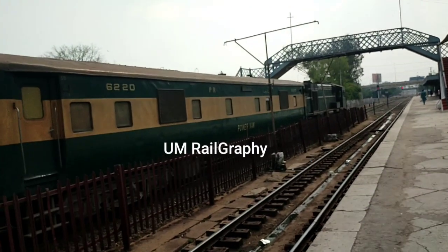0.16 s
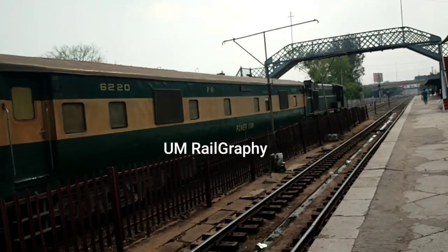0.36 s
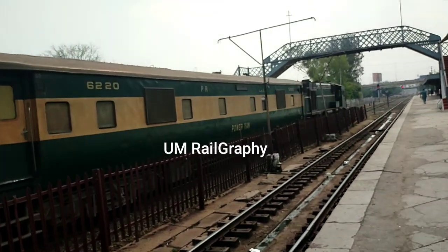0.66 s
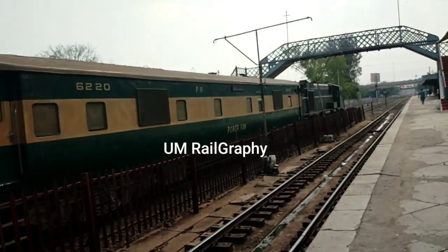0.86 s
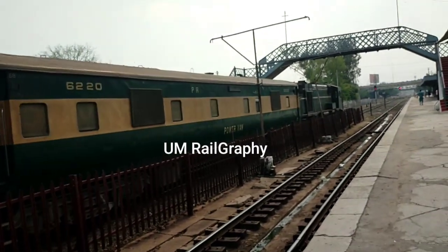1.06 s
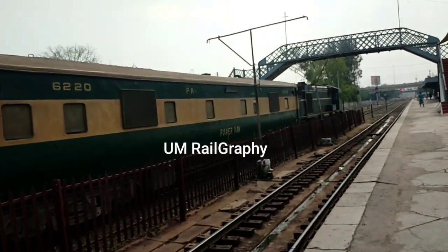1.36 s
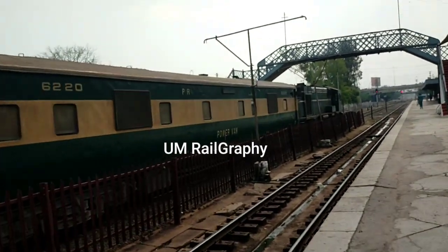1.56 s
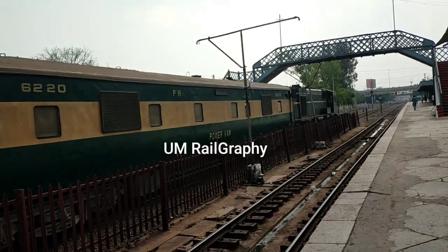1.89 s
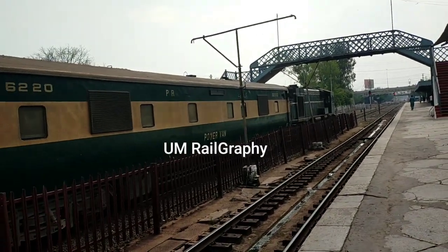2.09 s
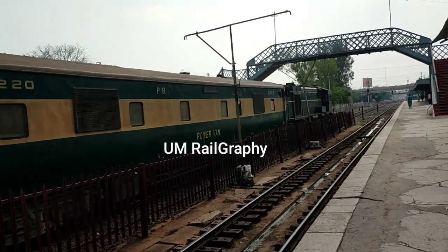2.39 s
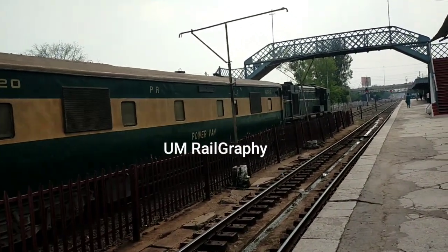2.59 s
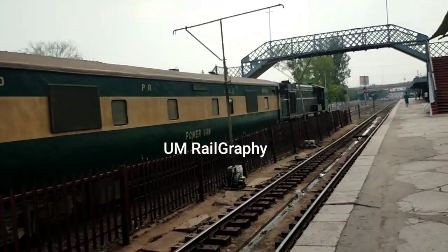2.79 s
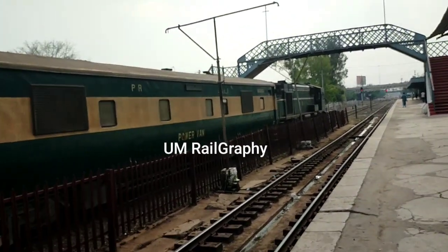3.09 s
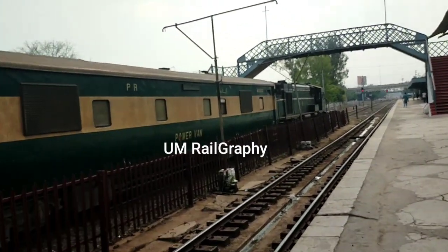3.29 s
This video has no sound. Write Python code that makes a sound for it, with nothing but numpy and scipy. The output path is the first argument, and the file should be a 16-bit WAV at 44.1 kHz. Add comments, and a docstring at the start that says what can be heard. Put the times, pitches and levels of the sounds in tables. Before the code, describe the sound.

Constant-speed diesel generator heard from an outdoor platform: deep throbbing hum and exhaust rumble, quick mechanical rattle, broad airy rush and faint hiss, slightly louder later as the walking listener's microphone nears the vents.

```python
"""On a station platform beside a standing train, a six-cylinder diesel generator runs in the power van.
Periodic firing gives the exhaust a harmonic series of engine orders above a turbulent rumble; two close tones
beat in a low drone. The block clatters in a pattern repeated every engine cycle, and cooling air rushes out
as shaped noise; both grow, on the whole, as the louvres come nearer. A faint hiss lies on top."""
import sys
import numpy as np
from scipy import signal
from scipy.fft import rfft, irfft
from scipy.io import wavfile
from scipy.ndimage import map_coordinates

SR = 44100
rng = np.random.default_rng(int(sys.argv[2]) if len(sys.argv) > 2 else 0)


def output_pcm(signal):
    """Save a mono or channel-first signal as 16-bit PCM at the path in sys.argv[1].

    Samples are clipped to [-1, 1] before scaling.
    """
    pcm = np.clip(np.atleast_2d(signal).T, -1, 1) * 32767
    wavfile.write(sys.argv[1], SR, np.round(pcm).astype(np.int16))


N = 152145
T = np.arange(N) / SR   # time [s]

CYCLE_HZ, CYLINDERS = 12.522, 6   # one cycle fires every cylinder once
SPEED_WANDER, WANDER_HZ = 0.00061, 1.4   # spread as a share of the speed; rate of drift
FLUTTER_HZ = 18   # rate of the level flutter in the air and the hiss


def from_db(db):
    """Logarithmic level: 20 dB is a tenfold amplitude."""
    return 10 ** (np.asarray(db) / 20)


def rms_one(x):
    """Power normalisation: scale to a mean square of one."""
    return x / np.sqrt(np.mean(x ** 2) + 1e-20)


def in_time(curve):
    """Linear interpolation: the level in dB at every sample of a (time, level) curve."""
    time_s, level_db = np.transpose(curve)
    return np.interp(T, time_s, level_db)


def drift(rate_hz):
    """Low-pass filtered noise: a smooth random wander of unit spread."""
    step = 100   # samples between the slow values
    pole = np.exp(-2 * np.pi * rate_hz * step / SR)
    white = rng.standard_normal(N // step + 2002)
    slow = signal.lfilter([1], [1, -2 * pole, pole * pole], white)[2000:]   # drop the filter's start
    slow = rms_one(slow - slow.mean())
    return np.interp(np.arange(N) / step, np.arange(len(slow)), slow)


def sine(turns):
    """Simple harmonic motion: a tone of unit power from a random starting phase."""
    return np.sqrt(2) * np.sin(2 * np.pi * (turns + rng.random()))


def coloured(white, spectrum):
    """Spectral shaping: weight unit white noise to a density in dB per Hz."""
    hz = np.maximum(np.arange(N // 2 + 1) * SR / N, 1)
    points_hz, db = np.transpose(spectrum)
    octaves_outside = np.abs(np.log2(hz / np.clip(hz, points_hz[0], points_hz[-1])))
    level_db = np.interp(np.log(hz), np.log(points_hz), db)
    level_db = level_db - 24 * octaves_outside   # falls away beyond the table's ends
    return irfft(rfft(white) * from_db(level_db), N) * np.sqrt(SR / 2)


def along_the_walk(white, table):
    """Cross-fading: the noise spectrum glides from column to column as the listener walks."""
    table = np.array(table)
    stops_s = np.linspace(0, T[-1], table.shape[1] - 1)
    out = 0
    for k, share in enumerate(np.eye(len(stops_s))):
        weight = np.interp(T, stops_s, share)
        out = out + weight * coloured(white, table[:, [0, k + 1]])
    return out


# Hum at twice the firing rate: (time [s], level [dB])
HUM_LEVEL = [(0.03, -23), (0.71, -22.5), (0.77, -25.5), (1.62, -24), (1.67, -20), (2.29, -25.5),
             (2.41, -33.5), (2.47, -27), (2.63, -39), (2.77, -26), (3.42, -27)]
# Exhaust orders: (multiple of the cycle rate [rounded to a whole order when played],
# level [dB] at four evenly spaced moments)
EXHAUST_ORDERS = [(6, -51, -46.5, -39, -38), (7, -49.5, -47.5, -47.5, -46), (9, -42, -42, -43.5, -43),
                  (10, -49, -46.5, -40.5, -49), (14, -39.5, -35, -37, -38.5), (15, -39, -37.5, -34, -41),
                  (26, -30, -33.5, -35.5, -47), (33, -57, -46, -49.5, -44), (34, -50, -48.5, -40, -38),
                  (36, -44, -41, -41, -42.5), (39, -46.5, -40.5, -37, -37.5),
                  (67.5, -44.5, -48.5, -52.5, -53), (82.13, -45.5, -48, -44.5, -50),
                  (111.15, -58.5, -51.5, -49, -50)]
# Swell of the rumble: (time [s], level [dB])
RUMBLE_LEVEL = [(0, 0), (.4, -2), (1.0, -0.5), (1.5, -1), (1.68, 2), (1.95, 1.5), (2.3, -0.5), (2.65, -2.5),
                (3.1, 1), (3.45, -3)]
# Rumble spectrum before the swell: (frequency [Hz], density [dB per Hz] at the start, midway, at the end)
RUMBLE_SPECTRUM = [(25, -97, -90, -88), (42, -90.5, -82.5, -82), (56.3, -77.5, -71, -74),
                   (71, -67.5, -65, -66), (100, -53, -52, -53), (141, -55, -53.5, -47.5),
                   (184, -46, -45, -48), (225, -58, -52.5, -55.5), (267, -47.5, -50.5, -50.5),
                   (332, -50.5, -57, -55.5), (392, -60.5, -58.5, -53.5), (495, -67.5, -57.5, -58),
                   (588, -70.5, -67.5, -70.5), (1000, -85, -88, -83)]
ORDER_WAVER_DB, WAVER_HZ = 1.5, 0.96


def exhaust(cycles):
    """Order analysis: tones at whole multiples of the cycle rate, with broadband turbulence."""
    out = from_db(in_time(HUM_LEVEL)) * sine(2 * CYLINDERS * cycles)
    for multiple, *levels_db in EXHAUST_ORDERS:
        level_db = np.interp(T, np.linspace(0, T[-1], len(levels_db)), levels_db)
        level_db = level_db + ORDER_WAVER_DB * drift(WAVER_HZ)
        out = out + from_db(level_db) * sine(round(multiple) * cycles)
    rumble = along_the_walk(rng.standard_normal(N), RUMBLE_SPECTRUM)
    return out + from_db(in_time(RUMBLE_LEVEL)) * rumble


# Gusty part, tone and noise together, before their own shares: (time [s], level [dB])
GUSTY_LEVEL = [(0.03, -34), (0.1, -36), (0.12, -28), (0.72, -30), (1.63, -24.5), (1.71, -17), (1.79, -30),
               (1.9, -14), (2.07, -34), (2.13, -15), (2.35, -33.5), (2.38, -24), (2.66, -29), (2.69, -45),
               (2.8, -16.5), (2.84, -40.5), (2.87, -34), (3.42, -30.5)]
# Steadier tone, probably fan blades: (time [s], level [dB])
FAN_LEVEL = [(0, -39), (.75, -36.5), (1.1, -29.5), (1.5, -29), (2.4, -31), (3.45, -30.5)]
GUSTY_TONE_HZ, GUSTY_TONE_DB, FAN_HZ = 203.2, -3.5, 207.6
BAND_HZ, BAND_WIDTH_HZ, BAND_NOISE_DB = 194, 36.4, -7.5   # narrow band of turbulence


def drone():
    """Beating: a swelling tone in narrow-band noise interferes with a steadier tone just above it."""
    edges_hz = [BAND_HZ - BAND_WIDTH_HZ / 2, BAND_HZ + BAND_WIDTH_HZ / 2]
    band = signal.butter(2, edges_hz, "band", fs=SR, output="sos")
    turbulence = rms_one(signal.sosfilt(band, rng.standard_normal(N + SR))[SR:])   # drop the filter's start
    tone = from_db(GUSTY_TONE_DB) * sine(GUSTY_TONE_HZ * T)
    gusty = tone + from_db(BAND_NOISE_DB) * turbulence
    fan = from_db(in_time(FAN_LEVEL)) * sine(FAN_HZ * T)
    return from_db(in_time(GUSTY_LEVEL)) * gusty + fan


# Nearness of the louvres, before the reference is subtracted: (time [s], level [dB])
NEARNESS = [(0.03, -32), (1.58, -32), (1.6, -30), (2.79, -30), (2.81, -27.5), (3.4, -28), (3.42, -29.5)]
NEARNESS_REF_DB = -29.5


def nearness_db():
    """Distance law in outline: the level follows the nearness of the louvres, relative to a reference."""
    return in_time(NEARNESS) - NEARNESS_REF_DB


KNOCK_DEPTH, KNOCK_DECAY_S = 0.19, 0.0023   # height as a share of the steady part


def firing_surge(cycles):
    """Amplitude modulation: every firing gives an equal surge that decays exponentially."""
    age_s = cycles * CYLINDERS % 1 / (CYCLE_HZ * CYLINDERS)
    return rms_one(1 + KNOCK_DEPTH * np.exp(-age_s / KNOCK_DECAY_S))


def every_cycle(cycles):
    """Periodicity: one cycle of random rattle, played again on every engine cycle."""
    size = int(SR / CYCLE_HZ)
    pattern = rng.standard_normal(size)
    return rms_one(map_coordinates(pattern, [cycles % 1 * size], order=3, mode="grid-wrap"))


# Clatter spectrum before nearness: (frequency [Hz], density [dB per Hz] at the start, midway, at the end)
CLATTER_SPECTRUM = [(71.6, -73, -76, -74), (111, -62.5, -61.5, -60.5), (280, -58, -59, -56),
                    (470, -67.5, -63, -61), (660, -70, -70.5, -70.5), (770, -62.5, -64, -67.5),
                    (1050, -65, -61.5, -66.5), (1300, -65, -68, -61.5), (1990, -72.5, -72, -68.5),
                    (3170, -84.5, -83.5, -84), (4240, -110, -110, -110)]
PATTERN_CHANGE, PATTERN_HZ = .6, .8   # changing part against the fixed part; its rate of drift
CLATTER_FOLLOWS = 0.68   # dB of clatter per dB of nearness


def block_clatter(cycles):
    """Cyclostationary noise: a repeating rattle, slowly changing, throbs with the firings."""
    changing = rms_one(sum(drift(PATTERN_HZ) * every_cycle(cycles) for _ in range(3)))
    pattern = rms_one(every_cycle(cycles) + PATTERN_CHANGE * changing)
    clatter = along_the_walk(firing_surge(cycles) * pattern, CLATTER_SPECTRUM)
    return from_db(CLATTER_FOLLOWS * nearness_db()) * clatter


# Air spectrum before nearness: (frequency [Hz], density [dB per Hz] at the start, midway, at the end)
AIR_SPECTRUM = [(300, -76.5, -77, -74), (540, -61.5, -64.5, -71.5), (690, -67, -66, -67),
                (960, -61.5, -62, -60.5), (1300, -63.5, -62.5, -62), (1650, -65.5, -61.5, -61.5),
                (1780, -64, -65.5, -72), (1970, -66.5, -65.5, -63), (2670, -71.5, -71, -71.5),
                (3440, -76, -76.5, -78.5), (4020, -90.5, -92, -91.5), (5000, -105, -105, -105)]
AIR_FOLLOWS, AIR_FLUTTER_DB = 1.08, .5   # dB of air per dB of nearness; flutter spread


def cooling_air(cycles):
    """Flow noise: broadband turbulence throbs with the firings and flutters in level."""
    air = along_the_walk(firing_surge(cycles) * rng.standard_normal(N), AIR_SPECTRUM)
    level_db = AIR_FOLLOWS * nearness_db() + AIR_FLUTTER_DB * drift(FLUTTER_HZ)
    return from_db(level_db) * air


# Levels of the hiss and of the top treble, before trim and flutter: (time [s], level [dB])
HISS_LEVEL = [(0.03, -55), (0.07, -55), (0.44, -60), (0.49, -56.5), (1.35, -58.5), (1.73, -56),
              (1.75, -51.5), (1.79, -55.5), (1.96, -52.5), (2.03, -54.5), (2.3, -54.5), (2.37, -56),
              (2.38, -55), (2.95, -52), (2.99, -54.5), (3.42, -54.5)]
TOP_LEVEL = [(0.03, -64), (0.12, -63), (0.37, -69), (0.61, -61), (0.66, -69), (0.77, -61), (0.82, -67),
             (1.16, -64.5), (1.55, -66.5), (1.78, -60.5), (1.85, -67), (1.9, -61), (2.02, -62), (2.03, -63),
             (2.28, -62), (2.3, -58), (2.4, -65), (2.74, -60.5), (2.88, -56), (3.01, -62), (3.42, -61)]
# Relative spectra of the hiss and of the top treble: (frequency [Hz], density [dB])
HISS_SPECTRUM = [(2500, -16.5), (4000, -7.5), (4900, -2.5), (5600, 0.5), (6800, 1.5), (7650, -0.5),
                 (7900, -10.5), (8100, -5.5), (9000, -15), (12000, -27)]
TOP_SPECTRUM = [(6000, -8.5), (8400, 1.5), (9500, -1.5), (11500, -2), (13000, 1), (14800, 5), (15500, 4)]
HISS_TRIM_DB, TOP_TRIM_DB, HISS_FLUTTER_DB = 1.1, 2, 0.76


def hiss():
    """Band-shaped noise: a faint hiss and a thinner top treble come and go, sharing one flutter."""
    flutter_db = HISS_FLUTTER_DB * drift(FLUTTER_HZ)
    low = rms_one(coloured(rng.standard_normal(N), HISS_SPECTRUM))
    top = rms_one(coloured(rng.standard_normal(N), TOP_SPECTRUM))
    low_db = in_time(HISS_LEVEL) + HISS_TRIM_DB + flutter_db
    top_db = in_time(TOP_LEVEL) + TOP_TRIM_DB + flutter_db
    return from_db(low_db) * low + from_db(top_db) * top


def scene():
    """Superposition: one crankshaft phase times exhaust, clatter and air; all the sources add."""
    speed_hz = CYCLE_HZ * (1 + SPEED_WANDER * drift(WANDER_HZ))
    cycles = np.cumsum(speed_hz) / SR   # engine cycles turned so far
    mix = exhaust(cycles) + drone() + block_clatter(cycles) + cooling_air(cycles) + hiss()
    return mix[None]


def record(dry):
    """Band limiting: a steep elliptic low-pass cuts the top above 15.5 kHz."""
    low_pass = signal.ellip(12, .1, 80, 15500, fs=SR, output="sos")
    return signal.sosfilt(low_pass, dry)


dry = scene()
out = record(dry)
output_pcm(out)
```